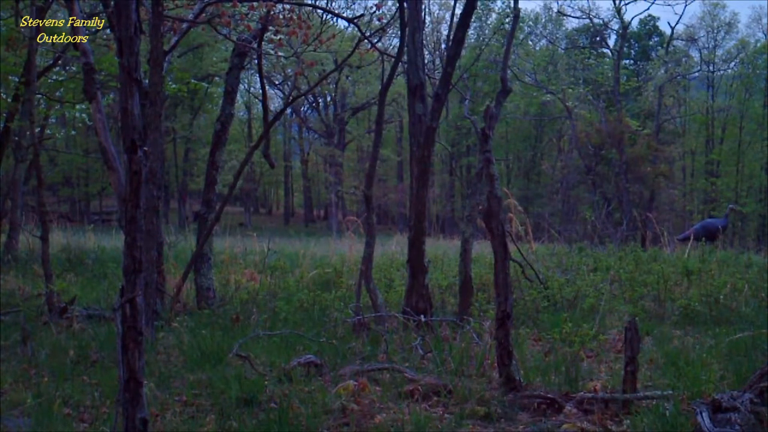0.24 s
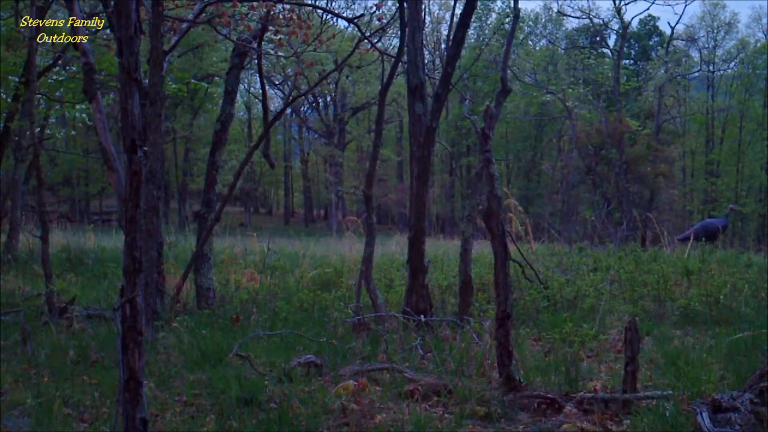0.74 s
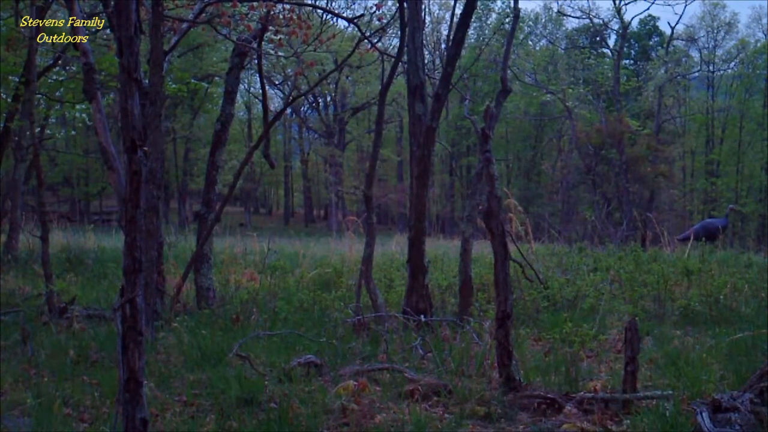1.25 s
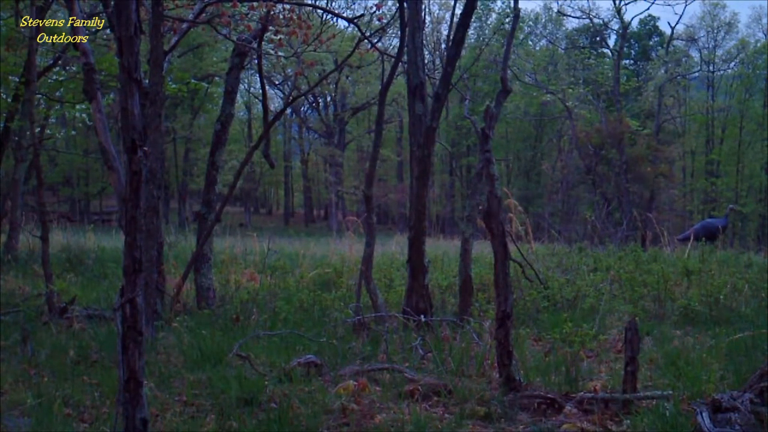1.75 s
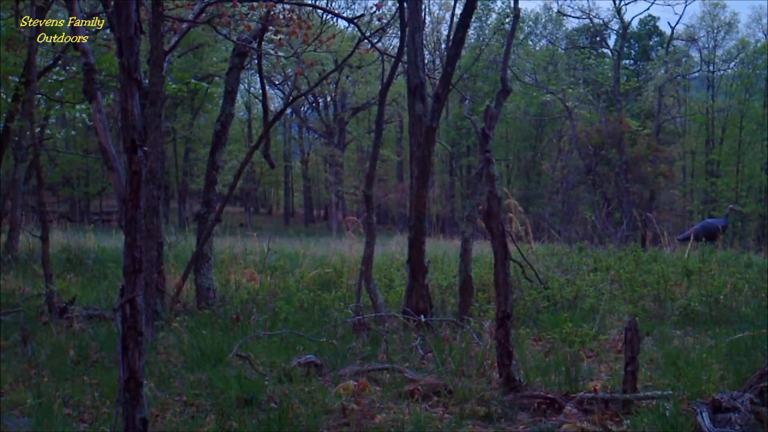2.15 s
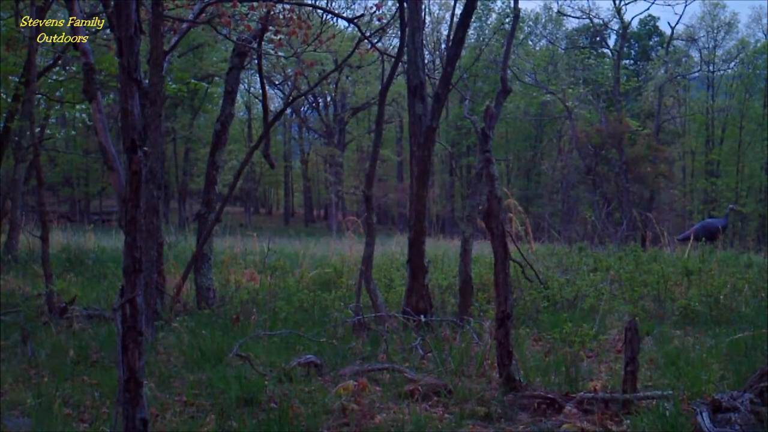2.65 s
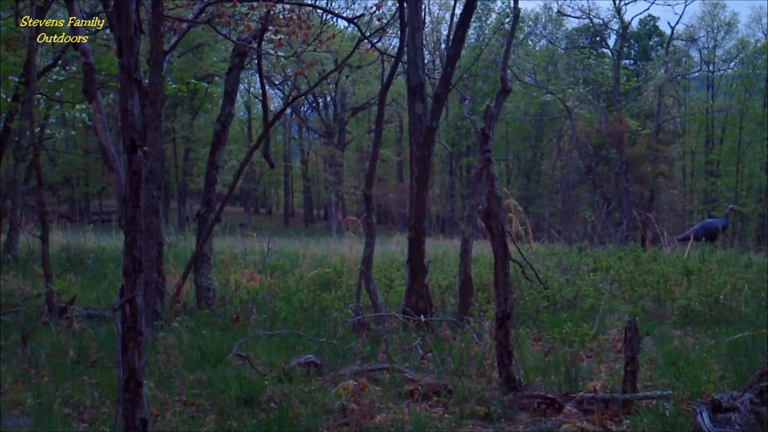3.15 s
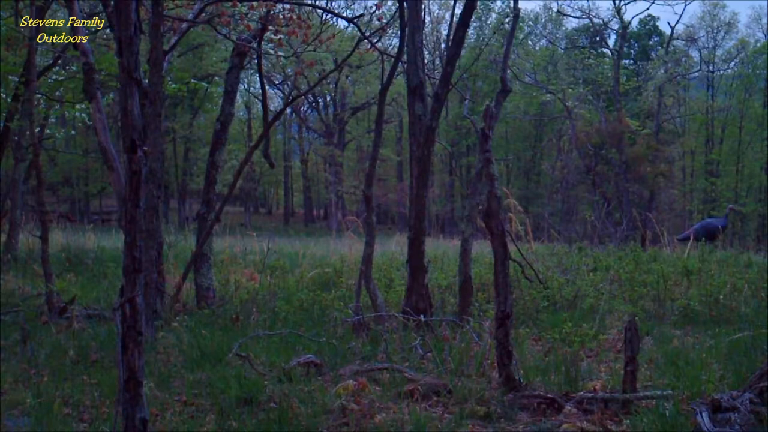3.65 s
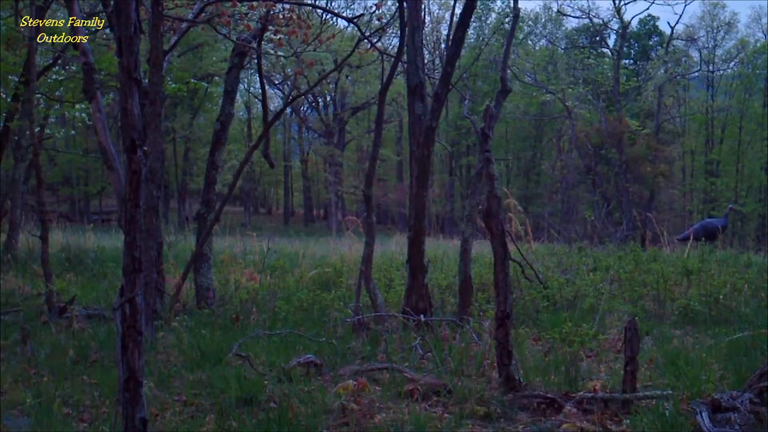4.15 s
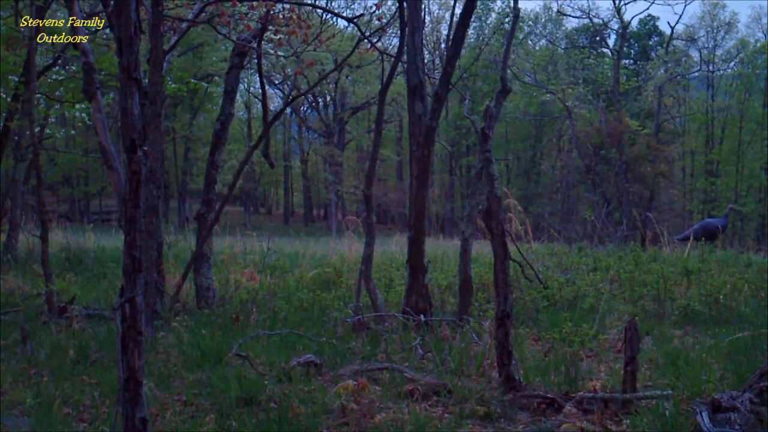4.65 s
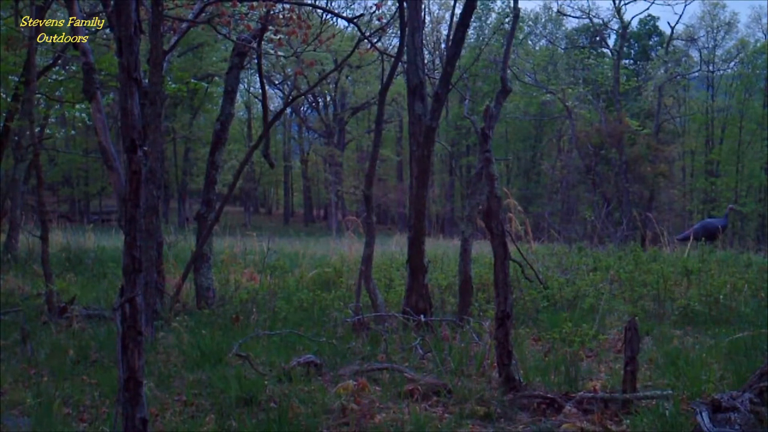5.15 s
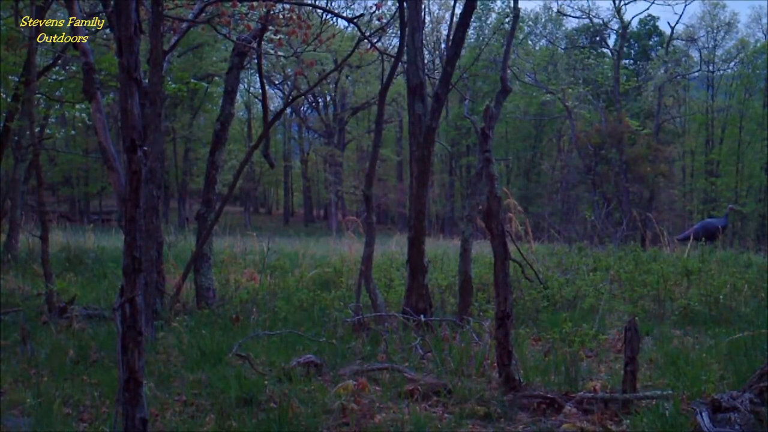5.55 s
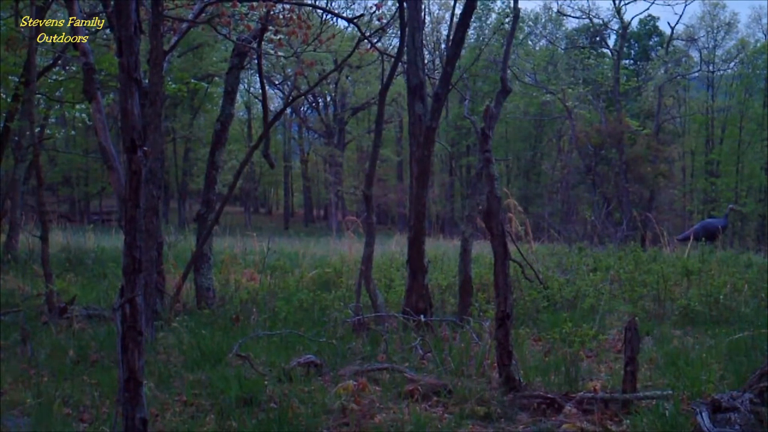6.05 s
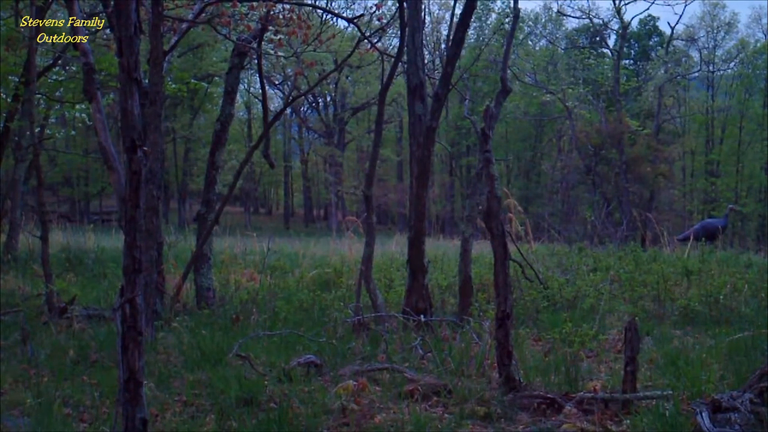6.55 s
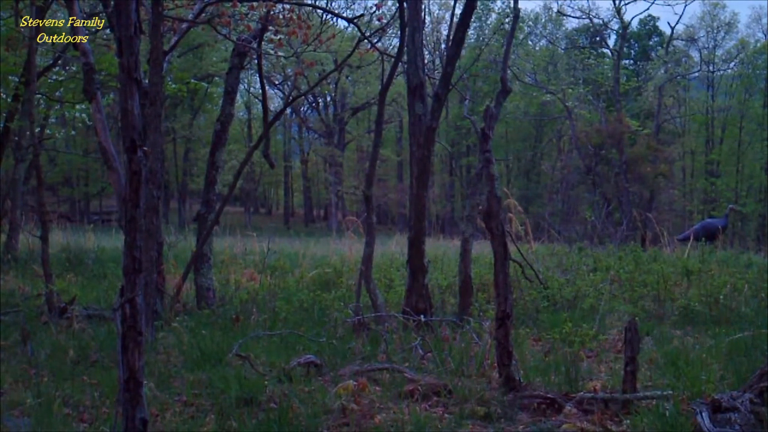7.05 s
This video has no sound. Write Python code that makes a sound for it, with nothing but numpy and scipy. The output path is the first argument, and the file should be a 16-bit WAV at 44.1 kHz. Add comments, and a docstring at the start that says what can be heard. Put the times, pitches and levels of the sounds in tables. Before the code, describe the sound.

Quiet woodland birdsong with a buzzing high whine, then the noise floor jumps and a turkey gobbles loudly, ringing through the trunks.

```python
"""A wild turkey gobbles across a clearing in open woods: harmonic pulses and noise puffs through resonances.
The trunks throw the call back as sparse decaying echoes.
Distant songbirds whistle, warble and trill as gliding sines, over a blurred chorus and dull knocks.
Behind them lie hiss, a low murmur, a late rumble and the whine and hum of electronics.
Just before the gobble the hiss, murmur, whine and hum step up together."""
import sys
import numpy as np
from scipy import signal
from scipy.fft import rfft, irfft
from scipy.io import wavfile
from scipy.ndimage import uniform_filter1d

SR = 44100
rng = np.random.default_rng(int(sys.argv[2]) if len(sys.argv) > 2 else 0)


def ratio_of_db(decibels):
    """Turn decibels (scalar or array-like) into linear amplitude factors; 0 dB maps to 1."""
    return 10 ** (np.asarray(decibels, float) / 20)


def to_wav(s):
    """Save 16-bit WAV."""
    ch = np.atleast_2d(s).T  # columns
    pcm = np.round(np.clip(ch, -1, 1) * 32767)  # PCM
    wavfile.write(sys.argv[1], SR, pcm.astype(np.int16))


N = 322371
T = np.arange(N) / SR
STEP_S = 5.8463  # the background steps up here

# low gurgle at about half the syllables' pitch: start_s, level_db
GURGLE = [(6.47, -39), (6.53, -47), (6.64, -45), (6.78, -48), (6.96, -43.5), (7.06, -50), (7.09, -41.5),
          (7.31, -48)]


def evened(x):
    """Scales to rms 1."""
    return x / np.sqrt(np.mean(x ** 2) + 1e-20)


def read(points, hz):
    """Reads a spectrum on a log-frequency axis."""
    f, value = np.transpose(points)
    return np.interp(np.log(hz + 1), np.log(f + 1), value)


def add(mix, start_s, sound):
    """Mixes a sound in at start_s."""
    part = mix[round(start_s * SR):][:len(sound)]
    part += sound[:len(part)]


def wobble(n, hz):
    """Smooth random drift of rms 1 with rates up to about hz."""
    span = max(int(SR / hz), 2)
    noise = rng.standard_normal(n + 2 * span)
    smooth = uniform_filter1d(uniform_filter1d(noise, span), span)
    return smooth[span:span + n] * np.sqrt(1.5 * span)


def gobble():
    """Turkey call: open-beak syllables and half-closed coos over the gurgle."""
    # open-beak syllables: start_s, length_s, first_pitch_hz, turning_pitch_hz, level_db
    syllables = [(6.252, 0.032, 489, 582, -37.5), (6.316, 0.053, 522, 696, -38.5),
                 (6.423, 0.045, 562, 663, -34), (6.46, .04, 602, 519, -37), (6.53, .033, 653, 692, -43),
                 (6.604, 0.049, 602, 617, -42.5), (6.659, 0.046, 609, 626, -47),
                 (6.692, 0.04, 611, 646, -38), (6.769, 0.037, 620, 604, -43),
                 (6.806, 0.035, 548, 569, -38.5), (6.857, 0.04, 546, 548, -39.5),
                 (6.894, 0.034, 571, 639.5, -38.5), (6.972, 0.039, 533, 560, -45.5),
                 (7.053, 0.053, 588.5, 631, -43.5), (7.104, 0.055, 594, 673, -44),
                 (7.175, 0.039, 608, 601, -50), (7.215, .036, 593, 610, -48),
                 (7.247, 0.045, 606, 598, -45.5)]
    # hoarseness: time_s, roughness_0_to_1
    hoarse = [(6.25, .08), (6.32, .12), (6.42, .4), (6.47, .3), (6.55, .4), (6.69, .3), (6.8, .45),
              (6.9, .3), (7.31, .35)]
    # noisy upper bands relative to the mouth tone: time_s, level_db
    rasp = [(6.25, -13.5), (6.45, -14), (6.55, 2), (6.7, -6), (6.9, -10), (7.0, -2), (7.3, -6)]
    # mouth resonance: time_s, centre_hz, width_hz
    mouth = [(6.25, 1840, 920), (6.32, 1620, 1330), (6.42, 2000, 1300), (6.47, 1780, 1400),
             (6.6, 2200, 1600), (6.8, 1940, 1500), (6.86, 1700, 1300), (6.9, 2160, 1600), (7.3, 2190, 1720)]
    # half-closed coos between and over the syllables: start_s, length_s, level_db
    coos = [(6.371, 0.049, -43.5), (6.91, 0.035, -39), (6.955, 0.035, -41), (7.11, 0.073, -47.5)]
    out = np.zeros(N)
    at_s, mouth_hz, width_hz = np.transpose(mouth)
    for start_s, *row in syllables:
        resonance = np.interp(start_s, at_s, mouth_hz), np.interp(start_s, at_s, width_hz)
        rough = np.interp(start_s, *np.transpose(hoarse))
        rasp_db = np.interp(start_s, *np.transpose(rasp))
        add(out, start_s, syllable(*row, *resonance, rough, rasp_db))
    for start_s, length_s, db in coos:
        coo = syllable(length_s, first_hz=651, turn_hz=668, db=db, mouth_hz=1250, width_hz=1070,
                       rough=.2, rasp_db=-9.5)
        add(out, start_s, coo)
    add(out, GURGLE[0][0], gurgle())
    return out


def syllable(length_s, first_hz, turn_hz, db, mouth_hz, width_hz, rough, rasp_db):
    """Pitch sweeps to a turning point and sags; the sound swells and stops short."""
    # beak resonances: centre_hz, width_hz, level_db
    beak = [(2880, 870, -0.5), (3518, 360, 5), (4520, 520, -12.5), (6200, 1700, -18.5)]
    sag = 0.635  # final pitch drop as a share of the sweep
    u = np.linspace(0, 1, round(length_s * SR))
    end_hz = turn_hz - sag * abs(turn_hz - first_hz)
    hz = np.interp(u, [0, .6, 1], [first_hz, turn_hz, end_hz])
    hz = uniform_filter1d(hz, size=300, mode="nearest")
    swell = np.interp(u, [0, .2, .7, .88, 1], [0.16, 0.61, 0.65, 0.44, 0.32])
    swell = swell * ratio_of_db(2.1 * wobble(len(u), 92))  # the throat flutters
    tone = np.pad(voice(hz, rough) * swell, (0, 400))  # room to ring
    rasp = np.pad(voice(hz, .6) * swell, (0, 400))
    shape = [(mouth_hz, width_hz, 0)]
    mouth = evened(tract(tract(tone, shape), shape))  # twice: steep skirts
    return ratio_of_db(db) * (mouth + ratio_of_db(rasp_db) * evened(tract(rasp, beak)))


def gurgle():
    """A very rough low voice through the chest, throbbing."""
    # chest resonances: centre_hz, width_hz, level_db
    chest = [(641, 220, -8), (990, 217, 5.5), (1318, 256, 3), (2000, 920, -4.5)]
    pitch_hz, drift_hz = 325, 13
    at_s, db = np.transpose(GURGLE)
    t = np.arange(at_s[0], at_s[-1], 1 / SR)
    source = voice(pitch_hz + drift_hz * wobble(len(t), 25), .62)
    sound = evened(tract(source, chest))
    level_db = np.interp(t, at_s, db) + 2.1 * wobble(len(t), 45)
    return sound * ratio_of_db(level_db) * np.minimum((t - at_s[0]) / 0.018, 1)


def voice(hz, rough):
    """Jittered harmonic pulses, strong and weak in turn when hoarse, blended with puffs of noise."""
    turns = np.cumsum(hz * (1 + .09 * rough * wobble(len(hz), 140))) / SR + rng.random()
    harmonics = range(1, int(7000 / hz.max()))
    pulses = sum(np.cos(2 * np.pi * k * turns + 0.347 * k * k) for k in harmonics)
    # half-pitch modulation makes every other pulse weak
    pulses = pulses * (1 + 1.5 * rough * np.cos(np.pi * turns + wobble(len(hz), 40)))
    puffs = (0.18 + np.exp(-(turns % 1) / 0.18)) * rng.standard_normal(len(hz))
    return (1 - rough) * evened(pulses) + .55 * rough * evened(puffs)


def tract(x, modes):
    """Sum of steep resonances of alternating sign."""
    out = 0
    for k, (hz, width_hz, db) in enumerate(modes):
        band = signal.iirpeak(hz, hz / width_hz, SR)
        ring = signal.lfilter(*band, signal.lfilter(*band, x))
        out = out + (-1) ** k * ratio_of_db(db) * ring
    return out


def woods(x):
    """Trunk echoes: sparse taps of random sign, each band dying at its own speed, unit total energy."""
    # echo decay: band_hz, t60_s
    decay = [(500, 1), (1500, 0.36), (3000, 0.47), (5000, 0.43), (8000, 0.24)]
    taps, at = np.zeros(SR), np.arange(500, SR - 20, 20)
    taps[at + rng.integers(0, 20, len(at))] = rng.choice([-1., 1.], len(at))
    hz, t, z = signal.stft(taps, SR, nperseg=256)
    fade = ratio_of_db(-60 * t / read(decay, hz)[:, None])
    tail = signal.istft(z * fade, SR, nperseg=256)[1]
    return signal.fftconvolve(x, tail / np.linalg.norm(tail))[:N]


def songbirds():
    """Short gliding notes, even trills and long whistles that trail off."""
    # short notes: start_s, length_s, start_hz, end_hz, level_db
    notes = [(0, 0.021, 4650, 4900, -67), (.03, .08, 3650, 3680, -72), (.03, .11, 3250, 3150, -70.5),
             (.17, .05, 3184, 3170, -70), (.195, .04, 3700, 3750, -71), (.33, 0.036, 3750, 3740, -69),
             (.332, .09, 4280, 4450, -72), (.331, .16, 3090, 3100, -75), (.485, .08, 3700, 3715, -69.5),
             (.527, .07, 4290, 4370, -75), (0.546, .08, 3220, 3240, -74), (.64, .09, 4780, 4830, -77),
             (.649, 0.053, 3590, 3680, -73), (0.805, 0.091, 4110, 4050, -70), (.826, .04, 4720, 4740, -72),
             (1.11, 0.023, 7800, 8250, -64), (2.35, 0.028, 7700, 8150, -67), (2.63, .09, 3880, 3720, -78),
             (3.55, .05, 2630, 2340, -74), (3.928, 0.076, 2530, 2160, -72), (4.032, 0.024, 2275, 2240, -73),
             (4.633, .04, 5780, 5880, -68), (4.723, .05, 4630, 4900, -68), (4.81, .05, 4150, 4280, -71),
             (4.924, 0.041, 3110, 2990, -70), (4.95, .12, 2310, 1880, -74.5),
             (4.84, 0.089, 4730, 4850, -75), (4.828, .08, 3570, 3630, -79), (5.055, .015, 5300, 6200, -69),
             (5.287, 0.058, 3700, 3700, -77), (4.958, .08, 3730, 3750, -77), (4.968, .07, 4330, 4300, -73),
             (5.038, .026, 5200, 4820, -66), (5.219, .067, 4490, 4260, -62),
             (5.26, 0.064, 4110, 3930, -62.5), (5.265, .056, 4740, 5150, -67),
             (5.272, .055, 4620, 4520, -66), (5.64, .026, 6200, 5740, -66), (6.12, 0.15, 2300, 1800, -65),
             (6.387, 0.054, 4480, 4350, -55), (6.411, 0.084, 4060, 4350, -51), (6.45, .05, 4550, 4590, -54)]
    # trills, one chip repeated evenly: start_s, chip_name, chip_count, first_level_db
    trills = [(.012, "hook", 4, -63), (.097, "cluck", 4, -65), (.19, "slur", 4, -76.5),
              (.653, "dip", 2, -58.5), (2.868, "rise", 9, -67), (5.386, "fall", 7, -60),
              (5.414, "flick", 7, -66.5), (5.679, "arch", 2, -68), (6.475, "fall", 10, -50.5)]
    # chip shapes by name: length_s, start_hz, middle_hz, end_hz, repeat_s, fade_db_per_chip
    chip_shapes = {"rise": (.017, 4550, 4800, 5050, .0671, 1.3),
                   "fall": (0.0226, 4300, 4040, 3700, .0671, 0.57),
                   "flick": (0.013, 2410, 2700, 3360, .0671, 0.56),
                   "hook": (.04, 3850, 4120, 4150, .0755, 1.9),
                   "cluck": (0.0414, 3150, 3370, 3050, .363, 0.092),
                   "slur": (.11, 2130, 2000, 1570, .361, .1), "dip": (0.044, 7150, 6750, 7450, 1.035, 1.9),
                   "arch": (0.0305, 5200, 5300, 4250, .118, 1.5)}
    # long whistles: start_s, length_s, start_hz, end_hz, level_db
    whistles = [(2.14, .24, 4450, 4350, -72.5), (2.502, 0.23, 2675, 2626, -75),
                (3.413, .14, 2730, 2640, -65.5), (3.795, 0.14, 2746, 2610, -65),
                (4.589, 0.167, 5150, 5080, -68), (5.845, 0.058, 5160, 5160, -58),
                (5.845, 0.75, 3735, 3645, -50)]
    out = np.zeros(N)
    for start_s, length_s, start_hz, end_hz, db in notes:
        n = round(length_s * SR)
        note = whistle(np.linspace(start_hz, end_hz, n), db, 1.3)
        add(out, start_s, note * signal.windows.tukey(n, .5))

    for start_s, chip, count, db in trills:
        length_s, *hz, every_s, fade_db = chip_shapes[chip]
        u = np.linspace(0, 1, round(length_s * SR))
        for k in range(count):
            note = whistle(np.interp(u, [0, .5, 1], hz), db - k * fade_db, 1.1)
            add(out, start_s + k * every_s, note * signal.windows.tukey(len(u), .6))

    rise_s, fade_db_per_s, tail_db, tail_s = .006, 11, -10, .2
    waver_hz_per_s, throb_db_per_s = 20, 3  # rms per second of length: longer whistles waver more
    for start_s, length_s, start_hz, end_hz, db in whistles:
        t = np.arange(0, length_s + tail_s, 1 / SR)
        trail_db = np.interp(t - length_s, [0, .012, tail_s], [0, tail_db, 2 * tail_db])
        hz = np.interp(t, [0, length_s], [start_hz, end_hz])
        hz = hz + waver_hz_per_s * length_s * wobble(len(t), 60)
        throb_db = throb_db_per_s * length_s * wobble(len(t), 45)
        note = whistle(hz, db - fade_db_per_s * t + trail_db + throb_db, 1.8)
        add(out, start_s, note * np.minimum(t / rise_s, 1))
    return out


def whistle(hz, db, flutter_db):
    """A near sine that the air between the trees makes flutter."""
    level = np.sqrt(2) * ratio_of_db(db + flutter_db * wobble(len(hz), 120))
    return level * np.sin(2 * np.pi * np.cumsum(hz) / SR)


def chorus():
    """Far birds too blurred for single notes: many short random bent glides."""
    # chorus level: time_s, level_db
    levels = [(0, -71), (.6, -71), (.92, -78), (1.3, -105), (2.55, -103), (2.7, -75), (2.85, -100),
              (3.7, -88), (4.1, -79.5), (4.5, -78), (4.75, -73), (5.4, -70), (5.9, -77), (7.31, -74)]
    out, u = np.zeros(N), np.linspace(0, 1, 1800)
    for at, pitch, glide, bend, size in rng.random((1300, 5)):
        hz = 3200 + 1800 * pitch + 500 * (glide - .5) * u + 500 * (bend - .5) * np.sin(np.pi * u)
        note = np.hanning(len(u)) * np.sin(2 * np.pi * np.cumsum(hz) / SR)
        add(out, at * N / SR, ratio_of_db(8 * size) * note)
    return evened(out) * ratio_of_db(np.interp(T, *np.transpose(levels)))


def knocks():
    """Dull knocks, each one quickly damped ring."""
    # knocks: start_s, level_db, pitch_hz, t60_s
    rings = [(4.18, -42.5, 433, 0.017), (4.664, -53, 780, 0.033), (4.676, -51, 790, 0.026)]
    out, t = np.zeros(N), np.arange(3000) / SR
    for start_s, db, hz, t60_s in rings:
        ring = ratio_of_db(db - 60 * t / t60_s) * np.sin(2 * np.pi * hz * t)
        add(out, start_s, ring * np.minimum(t / 0.001, 1))
    return out


def hiss():
    """Smooth noise of air and circuits, louder after the step."""
    # relative noise density: frequency_hz, density_db
    spectrum = [(8, -20), (25, -2.5), (48, -5), (65, -0.5), (120, -6.5), (280, -13.5), (600, -11),
                (1050, -12), (1500, -16), (4000, -17), (9000, -21), (16000, -22.5)]
    # rise at the step: frequency_hz, gain_db
    lift = [(30, 11), (100, 8.5), (400, 11), (2000, 10), (10000, 10)]
    before_db = -64  # rms before the step
    hz = np.fft.rfftfreq(N, 1 / SR)
    noise = rfft(rng.standard_normal(N)) * ratio_of_db(read(spectrum, hz))
    before = irfft(noise, N)
    after = irfft(noise * ratio_of_db(read(lift, hz)), N)
    return np.where(T < STEP_S, before, after) * ratio_of_db(before_db) / np.std(before)


def rumble():
    """Far low noise that enters late and grows."""
    # rumble level: time_s, level_db
    levels = [(6.2, -67), (6.5, -59.5), (6.9, -61), (7.31, -55.5)]
    band = signal.butter(2, (45, 110), "band", fs=SR, output="sos")
    low = signal.sosfilt(band, rng.standard_normal(N))
    return evened(low) * ratio_of_db(np.interp(T, *np.transpose(levels), left=-120))


def murmur():
    """Distant low noise that swells and fades, lifted at the step."""
    # murmur level before the lift: time_s, level_db
    levels = [(0, -71.5), (1.3, -77.5), (2.9, -71), (3.6, -81), (4.4, -83), (5.3, -70), (5.8, -81),
              (7.31, -73.5)]
    band = signal.butter(2, (270, 1100), "band", fs=SR, output="sos")
    low = signal.sosfilt(band, rng.standard_normal(N))
    lift_db = 11.0 * (T >= STEP_S)
    return evened(low) * ratio_of_db(np.interp(T, *np.transpose(levels)) + lift_db)


def electronics():
    """A whine whose sign flips at an even rate, and a few steady tones; all lifted at the step."""
    # steady tones, rms level before the step: pitch_hz, level_db, wander_hz
    tones = [(29.9, -71, .3), (14488, -84, 5), (15734.3, -81, .1)]
    whine_hz, whine_db, flips_per_s, lift_db = 7867.13, -61, 60.0575, 9.5  # whine_db before the step
    late = T >= STEP_S
    first_flip_s = np.where(late, 5.8557, .01276)  # the flips restart at the step
    flips = np.sign(np.sin(np.pi * flips_per_s * (T - first_flip_s)))
    flips = uniform_filter1d(flips, size=16)
    out = ratio_of_db(whine_db) * flips * np.sin(2 * np.pi * whine_hz * T)
    for hz, db, wander_hz in tones:
        phase = 2 * np.pi * np.cumsum(hz + wander_hz * wobble(N, 8)) / SR
        out = out + ratio_of_db(db) * np.sin(phase)
    return np.sqrt(2) * out * ratio_of_db(lift_db * late)


def scene():
    """Turkey and songbirds with their echoes over the background; both channels alike."""
    turkey, birds, far = gobble(), songbirds(), chorus()
    echoes = ratio_of_db(-7.0) * woods(turkey) + woods(ratio_of_db(-7.5) * birds + far)
    calls = turkey + birds + 0.2 * far + echoes  # the chorus is mostly heard through its echoes
    background = hiss() + rumble() + murmur() + electronics()
    mix = calls + knocks() + background
    return np.array([mix, mix])


def band_limit(x):
    """A steep low-pass at the top of the band."""
    return signal.sosfilt(signal.butter(12, 16250, fs=SR, output="sos"), x)


def record(dry):
    """Turns the finished mix into the output sound."""
    return band_limit(dry)


dry = scene()
out = record(dry)
to_wav(out)
```